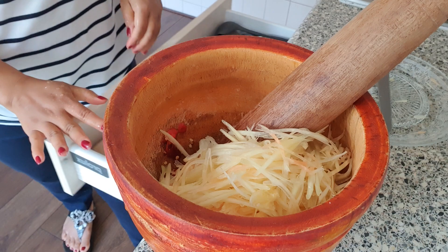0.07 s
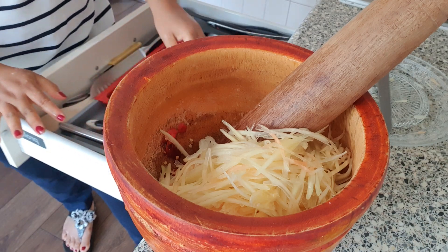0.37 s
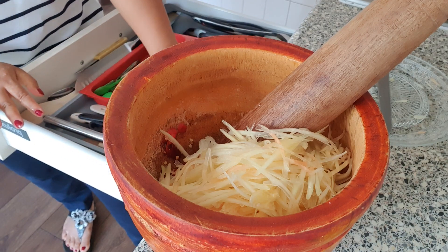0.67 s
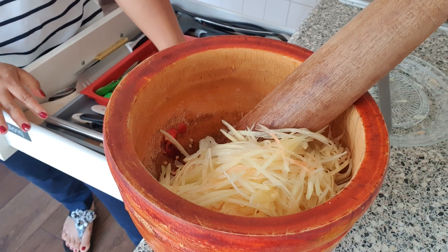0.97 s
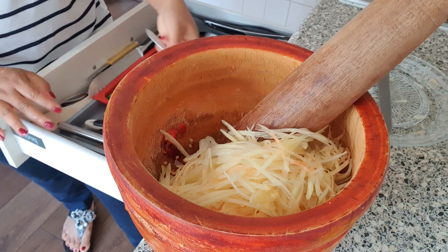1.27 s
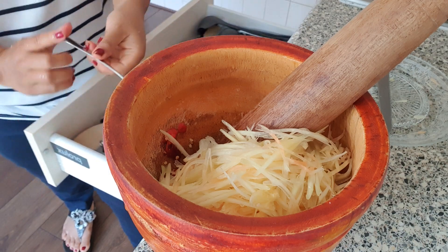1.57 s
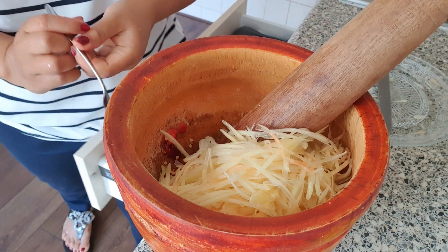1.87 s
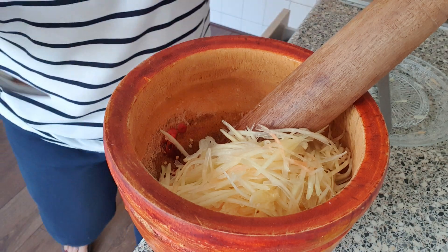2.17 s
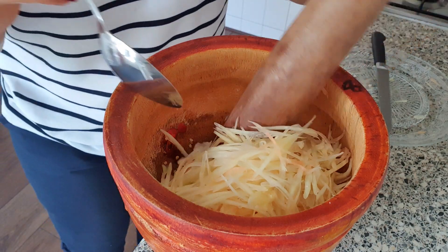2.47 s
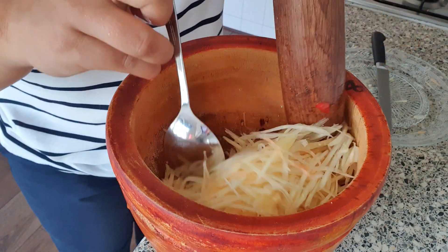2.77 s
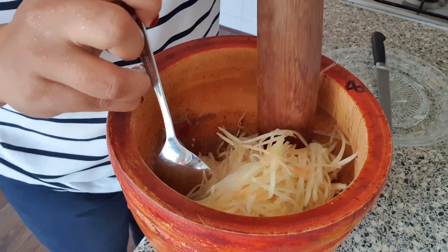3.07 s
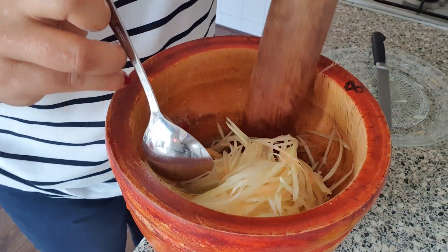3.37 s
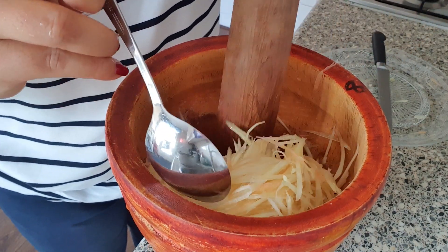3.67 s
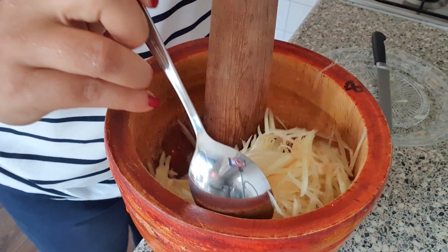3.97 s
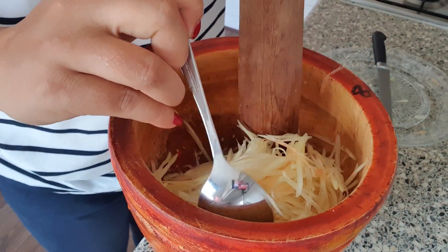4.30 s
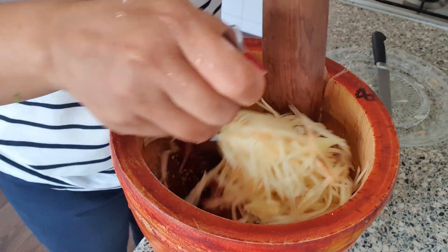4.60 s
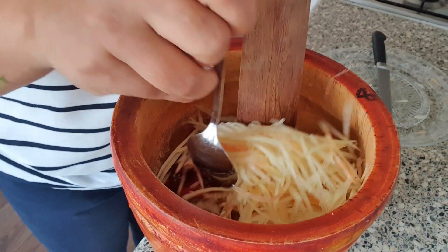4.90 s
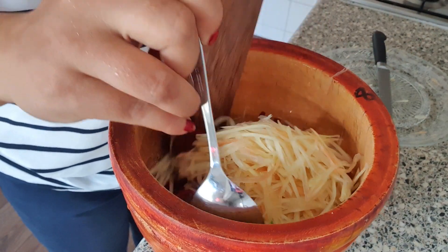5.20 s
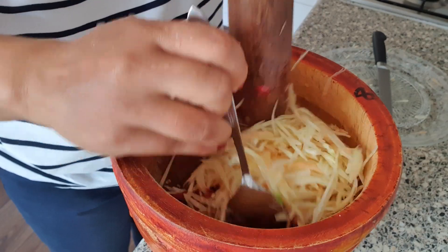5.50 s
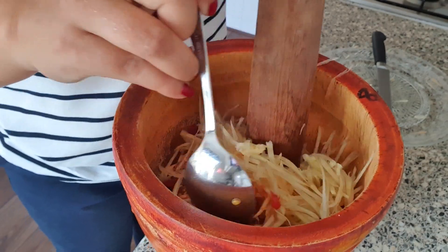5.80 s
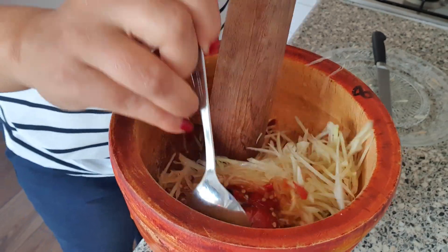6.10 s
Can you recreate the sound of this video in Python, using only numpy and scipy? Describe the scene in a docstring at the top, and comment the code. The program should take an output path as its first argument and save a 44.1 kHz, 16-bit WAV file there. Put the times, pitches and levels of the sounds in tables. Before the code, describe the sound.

Cutlery clatters in a drawer that rolls shut, followed by hollow wooden knocks, dull thuds and squelches from a pestle and mortar.

```python
"""A small, hard kitchen. A drawer rumbles open on its bearings, a spoon is dragged from the cutlery tray,
steel scraping on steel, and the drawer is pushed shut. Then a wooden pestle works shredded vegetables
in a wooden mortar on a stone counter: sharp knocks where wood meets wood, dull thuds through the food,
wet squelches and low groans under each press, and small ticks and scrapes of the spoon."""
import sys
import numpy as np
from scipy import signal
from scipy.fft import rfft, irfft, next_fast_len
from scipy.io import wavfile
from scipy.ndimage import uniform_filter1d

SR = 44100
rng = np.random.default_rng(int(sys.argv[2]) if len(sys.argv) > 2 else 0)


def output_pcm(signal):
    """Save a mono or channel-first signal as 16-bit PCM at the path in sys.argv[1].

    Samples are clipped to [-1, 1] before scaling.
    """
    pcm = np.clip(np.atleast_2d(signal).T, -1, 1) * 32767
    wavfile.write(sys.argv[1], SR, np.round(pcm).astype(np.int16))


N = 275625
TIME = np.arange(N) / SR
RING_S = np.arange(SR * 3 // 5) / SR   # time axis of a one-shot


def from_db(db):
    """Decibels to gain."""
    return 10 ** (np.asarray(db) / 20)


def rms_one(x):
    """Scale to unit power."""
    return x / np.sqrt(np.mean(x ** 2) + 1e-20)


def at_hz(points, hz):
    """Read a curve along log frequency."""
    known_hz, values = np.transpose(points)
    return np.interp(np.log(np.maximum(hz, 1)), np.log(known_hz), values)


def add(out, s, sound):
    """Drop a one-shot into the track at s seconds."""
    start = max(round(s * SR), 0)
    out[:, start:start + sound.shape[-1]] += sound[..., :N - start]


def decay(t60):
    """Envelope that falls 60 dB in t60 seconds."""
    return np.exp(-np.log(1000) * RING_S / t60)


def gesture(s, hold_s, attack_s, release_s):
    """Envelope of an effort: swells to its peak at s seconds, holds, releases."""
    return np.exp(-np.clip(np.maximum((s - TIME) / attack_s, (TIME - s - hold_s) / release_s), 0, 20))


def filtered(x, kind, hz, order=2):
    """Butterworth low-, high- or band-pass."""
    return signal.sosfilt(signal.butter(order, np.minimum(hz, SR / 2 - 1), kind, fs=SR, output="sos"), x)


def cushioned(x, hardness_hz, octaves):
    """A cushioned contact drives only a band of the low modes; the softer, the deeper."""
    return filtered(x, "band", [hardness_hz / 2 ** octaves, hardness_hz])


def grains(per_s, spread_db, grain_s):
    """Granular noise: tiny contacts of uneven size."""
    sizes = from_db(spread_db * np.minimum(rng.exponential(1, N), 4))
    contacts = sizes * (rng.random(N) < per_s / SR)
    power = signal.lfilter([1], [1, -np.exp(-1 / (grain_s * SR))], contacts ** 2 + 1e-12)
    return rms_one(np.sqrt(power) * rng.standard_normal((2, N)))


# Stereo image, centred lows and wide highs: (frequency [Hz], left-right correlation [0-1])
STEREO_LIKENESS = [(100, 1), (300, 0.88), (640, 0.66), (1400, 0.26), (3000, 0.011), (16000, 0.14)]
def coloured(white, colour):
    """EQ two unrelated noises and mix them as mid and side into a stereo pair; rms 1."""
    size = next_fast_len(white.shape[1], real=True)
    hz = np.arange(size // 2 + 1) * SR / size
    alike = at_hz(STEREO_LIKENESS, hz)
    mid, side = rfft(white, size) * from_db(at_hz(colour, hz))
    pair = np.sqrt(1 + alike) * mid + np.sqrt(1 - alike) * side * [[1], [-1]]
    return rms_one(irfft(pair, size)[:, :white.shape[1]])


def burst(colour=((1, 0),)):
    """Stereo noise for a one-shot, white unless given a colour."""
    return coloured(rng.standard_normal((2, len(RING_S))), colour)


def struck(modes, vary_db=1.0):
    """One hit: each mode varies in strength, and high modes reach the two sides out of step."""
    out = np.zeros((2, len(RING_S)))
    for hz, db, t60 in modes:
        lag = np.arccos(at_hz(STEREO_LIKENESS, hz)) * rng.permutation([0, 1])[:, None]
        phase = np.maximum(2 * np.pi * hz * RING_S - lag, 0)
        out += from_db(db + vary_db * rng.standard_normal()) * decay(t60) * np.sin(phase)
        out = -out   # neighbouring modes swing in opposite directions
    return out


def tick(hz, octaves, t60_at_1khz=0.065, damping=0.29):
    """One light touch in its own band, tighter the higher it is; peak 1."""
    touch = burst() * decay(t60_at_1khz / (hz / 1000) ** damping)
    band = filtered(touch + 1e-18, "band", hz * 2 ** (np.array([-.5, .5]) * octaves))
    return band / np.abs(band).max()


# EQ of the room tone: (frequency [Hz], level [dB])
ROOM_TONE_EQ = [(25, 12.5), (70, -0.5), (130, -15.5), (300, -2), (700, -33), (2000, -12), (5000, -14),
                (10000, -22), (16000, -48)]
def room_tone(level_db=-61):
    """A steady bed of low rumble and faint air."""
    return from_db(level_db) * coloured(rng.standard_normal((2, N)), ROOM_TONE_EQ)


# Length of the room's tail: (frequency [Hz], T60 [s])
REVERB_T60 = [(100, 0.46), (500, 0.45), (2000, 0.39), (5000, 0.43), (10000, 0.22), (16000, 0.19)]
# Reverb send: (frequency [Hz], level [dB])
REVERB_SEND = [(80, 1.5), (250, -14.5), (550, -6), (1200, -5), (3000, -8.5), (8000, -9), (16000, -12)]
def kitchen_reverb(dry, predelay_s=0.0073, build_s=0.00087):
    """Diffuse echoes build up after the first wall and die band by band."""
    white = burst()
    edges = np.geomspace(60, 17000, 15)
    onset = 1 - np.exp(-np.maximum(RING_S - predelay_s, 0) / build_s)
    response = 0
    for low, high in zip(edges, edges[1:]):
        hz = np.sqrt(low * high)
        band = np.roll(filtered(white, "band", [low, high]), rng.integers(len(RING_S)), axis=1)
        tail = rms_one(band * onset * decay(at_hz(REVERB_T60, hz)))
        unity_gain = np.sqrt(2 * (high - low) / SR / len(RING_S))
        response = response + from_db(at_hz(REVERB_SEND, hz)) * tail * unity_gain
    return signal.fftconvolve(dry, response, axes=1)[:, :N]


# Drawer cues (pull, recoil, nudge, push shut): (peak time [s], hold [s], level [dB], attack [s])
DRAWER_ROLLS = [(0.0, 0.031, -42.5, .02), (0.324, 0.012, -50, 0.0063), (0.581, 0.0045, -51.5, 0.02),
                (1.9, .48, -48.5, 0.32)]
# Swishes of the runners: (peak time [s], level [dB], attack [s], release [s])
RUNNER_SLIDES = [(.035, -50, 0.024, 0.063), (.6, -55.5, 0.014, 0.048), (1.95, -52.5, 0.073, .14),
                 (2.34, -53.5, 0.01, 0.14)]
# Low body of the panels: (frequency [Hz], level [dB])
RUMBLE_EQ = [(29, -26.5), (50, 2), (86, -0.5), (142, -5.5), (216, -6), (342, -10), (410, -4.5), (532, -5),
             (877, -11.5), (1210, -14), (1360, -15.5), (2980, -22), (6000, -38), (7800, -56.5),
             (13200, -120)]
# Bright top of runners and clinks: (frequency [Hz], level [dB])
HISS_EQ = [(2000, -6.5), (4000, -8), (7500, -13), (10000, -10), (12000, -21.5), (16000, -25)]
# Midrange chatter of loose cutlery: (frequency [Hz], level [dB])
JIGGLE_EQ = [(300, -14), (600, 8), (950, -9.5), (1240, 4.5), (1700, -23), (3050, 0), (3600, -10.5),
             (4300, -15.5), (7000, -34), (16000, -26)]
def drawer(rumble_db=7, hiss_db=5, jiggle_db=-5, clink_db=-15, coast_s=.1):
    """Bearings rumble through the drawer's panels; runners hiss, cutlery jiggles and clinks."""
    roll = sum(from_db(db) * gesture(s, hold, attack, coast_s) for s, hold, db, attack in DRAWER_ROLLS)
    slide = sum(from_db(db) * gesture(s, 0, attack, release) for s, db, attack, release in RUNNER_SLIDES)
    rumble = from_db(rumble_db) * coloured(grains(per_s=900, spread_db=2.2, grain_s=.003), RUMBLE_EQ)
    hiss = from_db(hiss_db) * coloured(grains(per_s=7100, spread_db=3, grain_s=.0023), HISS_EQ)
    jiggle = from_db(jiggle_db) * coloured(grains(per_s=45, spread_db=2.5, grain_s=.005), JIGGLE_EQ)
    clinks = from_db(clink_db) * coloured(grains(per_s=14, spread_db=2, grain_s=.002), HISS_EQ)
    return roll * (rumble + jiggle + clinks) + slide * hiss


# Drags through the tray: (peak time [s], hold [s], level [dB], attack [s])
CUTLERY_DRAGS = [(.73, 0.055, -32.5, 0.013), (0.983, 0.054, -21.5, 0.04)]
# Accents where pieces clash: (time [s], level [dB])
CUTLERY_CLASHES = [(0.982, -19), (1.094, -14.5)]
# Bright rasp of steel on steel: (frequency [Hz], level [dB])
STEEL_EQ = [(880, -2.5), (1500, -2), (1870, 0), (2040, -5), (2690, -0.5), (3960, 2), (5070, -1.5),
            (6430, -1), (7460, -4), (9850, -1), (11000, -8), (12600, -4), (16000, -9.5)]
# Shimmer of the cutlery: (frequency [Hz], level [dB], T60 [s])
STEEL_MODES = [(1921, -2, .08), (4040, -3, .12), (4659, 0, .25), (5329, -2, .22), (8324, -2, .22),
               (8779, -2, .22), (9205, -4, .22), (9842, -4, .22), (11617, -2, .25)]
# Boxy body of the tray: (frequency [Hz], level [dB])
TRAY_EQ = [(40, -10), (85, -6.5), (150, -6), (280, -17.5), (400, -1.5), (600, 3.5), (750, -2), (1020, 0),
           (1400, -10), (2500, -41)]
def cutlery(steel_db=-2.5, ring_db=-13, tray_db=-20, clash_db=-12, clash_t60=0.17, release_s=0.051):
    """Steel scrapes and clashes on steel, setting its modes ringing and the tray rattling."""
    drag = sum(from_db(db) * gesture(s, hold, attack, release_s) for s, hold, db, attack in CUTLERY_DRAGS)
    force = np.tile(from_db(steel_db) * drag, (2, 1))
    for s, db in CUTLERY_CLASHES:
        add(force, s, from_db(db + clash_db) * decay(clash_t60))
    scrape = force * coloured(grains(per_s=1900, spread_db=2.7, grain_s=.0009), STEEL_EQ)
    ring = scrape.std() * rms_one(signal.fftconvolve(scrape, struck(STEEL_MODES), axes=1)[:, :N])
    tray_drive = drag ** 0.63   # the tray follows the drag with compressed dynamics
    rattle = tray_drive * coloured(grains(per_s=310, spread_db=2.5, grain_s=.0035), TRAY_EQ)
    return scrape + from_db(ring_db) * ring + from_db(tray_db) * rattle


# Bumps on the spoon: (time [s], level [dB])
SPOON_TINGS = [(0.705, -34), (1.199, -31), (1.286, -40.5), (1.643, -23.5), (1.764, -34.5), (1.779, -28.5),
               (2.203, -30), (4.107, -40.5)]
# Choked ring of the spoon: (frequency [Hz], level [dB], T60 [s])
SPOON_MODES = [(1235, 0, .1), (1275, -4, .035), (2724, -27, .08), (3100, -22, .06), (4237, -32, .12)]
def spoon_tings():
    """The bumped spoon rings briefly, damped by the fingers."""
    out = np.zeros((2, N))
    for s, db in SPOON_TINGS:
        add(out, s, from_db(db) * struck(SPOON_MODES))
    return out


# Handling detail: (time [s], level [dB], centre [Hz], width [octaves])
HANDLING_TICKS = [(0.323, -29.5, 2820, 2.5), (0.358, -27, 2400, 1.17), (0.449, -43, 8050, 0.71),
                  (0.552, -33.5, 680, 2.7), (0.58, -29.5, 534, 0.36), (.659, -41, 7950, 0.74),
                  (.69, -33.5, 520, 1.3), (1.261, -32.5, 2240, 1), (1.488, -47.5, 4000, 2.6),
                  (1.519, -44, 8600, 0.32), (1.579, -43, 5470, 1.05), (2.203, -36, 1500, 0.81),
                  (2.417, -32.5, 2164, 0.54), (2.543, -28.5, 2400, 0.82), (2.726, -41, 2900, .25),
                  (3.423, -30.5, 990, 2.24), (3.54, -26.5, 5830, 1.16), (3.721, -23, 840, 0.89),
                  (3.72, -33, 3430, 2.3), (3.871, -27.5, 1640, 2.9), (5.04, -29, 2170, 0.9),
                  (6.231, -34, 2980, 2.4)]
def handling_ticks():
    """Spoon, tray and fingers touch lightly."""
    out = np.zeros((2, N))
    for s, db, hz, octaves in HANDLING_TICKS:
        add(out, s, from_db(db) * tick(hz, octaves))
    return out


# Strokes of the spoon on wood: (peak time [s], hold [s], level [dB])
SPOON_SCRAPES = [(4.22, 0.018, -54), (4.44, 0.21, -58), (4.839, .04, -60.5), (5.439, 0.01, -37)]
# Nasal peak of the scrape: (frequency [Hz], level [dB])
SCRAPE_EQ = [(900, -13), (1800, -10), (2250, 0), (2800, -7.5), (5000, -19), (12000, -34.5)]
def spoon_scrapes(attack_s=0.022, release_s=0.021):
    """The spoon's edge catches on the grain of the wood and sings in one resonance."""
    force = sum(from_db(db) * gesture(s, hold, attack_s, release_s) for s, hold, db in SPOON_SCRAPES)
    return force * coloured(grains(per_s=800, spread_db=4.5, grain_s=.0027), SCRAPE_EQ)


PRESS_HOLD_S, PRESS_RELEASE_S = 0.0082, 0.019
# Spoon and pestle press the shreds along the wall:
# (peak time [s], wet level [dB], groan level [dB], groan hardness [Hz], attack [s])
FOOD_PRESSES = [(3.207, -41, -40, 297, 0.074), (3.534, -47, -37.5, 250, .055), (3.581, -41, -41, 860, 0.02),
                (3.922, -40, -22, 252, 0.011), (3.979, -40, -22, 467, 0.029),
                (4.097, -49.5, -48, 403, 0.021), (4.283, -38.5, -60, 407, 0.009),
                (4.513, -42, -37, 690, 0.032), (4.642, -61, -39, 446, .04), (4.857, -58, -32.5, 506, 0.015),
                (4.905, -33.5, -36.5, 795, 0.012), (5.072, -52.5, -64, 397, 0.0067),
                (5.301, -34, -38, 295, 0.043), (5.745, -37, -41, 402, 0.071),
                (6.073, -37, -30.5, 300, 0.046)]
# Wet texture of the shreds: (frequency [Hz], level [dB])
SQUELCH_EQ = [(300, 0.5), (600, -7), (1200, -8), (2300, -4.5), (4200, -6.5), (7000, -15.5), (10000, -18),
              (16000, -35)]
def squelches(crackle_db=2, snap_db=7, snap_attack_s=0.014):
    """Wet fibres smear and crackle under each press; the quicker it is, the louder they snap."""
    pressure = sum(from_db(db) * gesture(s, PRESS_HOLD_S, attack_s, PRESS_RELEASE_S)
                   for s, db, _, _, attack_s in FOOD_PRESSES)
    mush = coloured(grains(per_s=1400, spread_db=1.5, grain_s=.003), SQUELCH_EQ)
    crackle = coloured(grains(per_s=420, spread_db=3.5, grain_s=.0006), SQUELCH_EQ)
    out = pressure * rms_one(mush + from_db(crackle_db) * crackle)
    for s, db, _, _, attack_s in FOOD_PRESSES:
        quickness = snap_attack_s / attack_s
        add(out, s, from_db(db + snap_db) * quickness * tick(hz=3740, octaves=1.56))
    return out


# Low end of the mortar rocking on counter and cabinet: (frequency [Hz], level [dB], T60 [s])
COUNTER_MODES = [(76.4, -8.5, 0.16), (97.6, -7, 0.25), (125.6, -3.5, 0.22), (153.4, -9.5, 0.12),
                 (184.4, -8, 0.11), (203.5, -9, 0.071), (223.6, -1.5, 0.11), (259.4, -1, 0.076),
                 (295.4, 0.5, 0.12), (321.3, -12, 0.16), (367, -12.5, 0.078), (471, -14.5, 0.1),
                 (550, -11, 0.11), (637, -2, .06), (810, -15.5, .06), (1106, -14.5, 0.11)]
def groans(slips_per_s=600):
    """Uneven slips keep the counter's low modes groaning for as long as a press lasts."""
    slips = rng.choice([-1, 1], N) * (rng.random(N) < slips_per_s / SR)
    groan = signal.fftconvolve(slips[None], struck(COUNTER_MODES), axes=1)[:, :N]
    out = 0
    for s, _, db, hardness_hz, attack_s in FOOD_PRESSES:
        rub = cushioned(groan, hardness_hz, octaves=1.5)
        running_rms = np.sqrt(uniform_filter1d(np.mean(rub ** 2, axis=0), size=1300) + 1e-12)
        even_rub = rub / running_rms   # the hand presses evenly
        out = out + from_db(db) * gesture(s, PRESS_HOLD_S, attack_s, PRESS_RELEASE_S) * even_rub
    return out


# Soft hits, drawer on its stops and pestle in the food: (time [s], level [dB], hardness [Hz])
SOFT_HITS = [(0.327, -29, 138), (.425, -37, 123), (2.337, -25, 187), (2.91, -25.5, 209), (3.166, -24, 199),
             (3.36, -29, 334), (3.43, -17, 290), (3.579, -30.5, 160.5), (3.979, -11.5, 454),
             (4.287, -27.5, 123.4), (4.899, -21.5, 222), (5.078, -31, 125), (5.312, -15.5, 145.7)]
def thuds(attack_s=.0008, lead_cycles=2.312, bounce_s=.036, bounce_db=-9.5, bounce_hardness=0.861):
    """Soft hits and the pestle's landing after each knock rock the counter, then bounce once."""
    out = np.zeros((2, N))
    landing_hz, hz_per_db = 372, 5   # a lighter landing is also duller
    landings = [(s + lag_s, db, max(landing_hz + hz_per_db * db, 100))
                for s, _, _, _, lag_s, db in PESTLE_KNOCKS]
    hits = landings + SOFT_HITS
    bounces = [(s + bounce_s, db + bounce_db, hz * bounce_hardness) for s, db, hz in hits]
    for s, db, hardness_hz in hits + bounces:
        body = struck(COUNTER_MODES) * (1 - np.exp(-RING_S / attack_s))
        thud = cushioned(body, hardness_hz, octaves=1.99)
        start_s = s - lead_cycles / hardness_hz   # each hit starts a few cycles before its listed time and peaks near it
        add(out, start_s, from_db(db) * thud / np.abs(thud).max())
    return out


# The pestle strikes the mortar's wall, then its weight lands:
# (time [s], level [dB], hardness [Hz], bowl ring [dB], landing lag [s], landing level [dB])
PESTLE_KNOCKS = [(2.787, 1, 3850, 4, 0.0055, -13), (3.843, -28, 1960, 1, 0.039, -10.5),
                 (4.582, -25, 1590, -4, .004, -22), (5.168, -24.5, 1880, 2.5, 0.0032, -44.5),
                 (5.203, 2.5, 2140, -1.5, .015, -4), (5.478, -2, 2270, -11, 0.0046, -9),
                 (5.629, 1, 2270, 0, 0.0151, -5.5), (5.666, -12, 2460, 4.5, 0.01037, -12),
                 (5.928, -5.5, 2450, -3, .016, -10.5), (6.019, -4.5, 2160, -1, 0.0029, -12.5)]
# Ring of mortar and pestle: (frequency [Hz], level [dB], T60 [s])
WOOD_MODES = [(205, -21, .2), (285, -20, .2), (455, -31, .1), (522, -19, .12), (556, -14, .14),
              (594, -19, .12), (615, -20, .12), (760, -29, .08), (835, -30, .12), (1077, -21, .14),
              (1330, -22, .04), (1755, -24, .06), (2030, -13, .04), (2083, -14, .07), (2520, -14, .025),
              (2990, -16, .03), (3600, -15, .02)]
# Hollow body of the clack: (frequency [Hz], level [dB])
CLACK_EQ = [(200, -2.5), (550, 17.5), (900, 4), (1500, 3), (2200, 4), (4000, 9.5), (7000, 9),
            (16000, -21.5)]
# Bright edge of a hard hit: (frequency [Hz], level [dB])
CRACK_EQ = [(2000, 10.5), (6000, 2), (9000, -1), (12000, -7.5), (16000, -17.5)]
def pestle_knocks(clack_db=-5, clack_t60=.035, hollow_db=-25, hollow_t60=0.32,
                  crack_db=-29, crack_t60=0.3, contact_s=0.00013):
    """Wood on wood: a short clack lingers in the bowl's hollow, the modes ring, hard hits also crack."""
    out = np.zeros((2, N))
    hardest_hz = max(hz for _, _, hz, *_ in PESTLE_KNOCKS)
    onset = 1 - np.exp(-RING_S / contact_s)
    for s, db, hardness_hz, ring_db, _, _ in PESTLE_KNOCKS:
        bite = (hardness_hz / hardest_hz) ** 2
        hollow = from_db(hollow_db + ring_db) * decay(hollow_t60)
        clack = from_db(clack_db) * burst(CLACK_EQ) * (decay(clack_t60) + hollow)
        crack = from_db(crack_db) * bite * burst(CRACK_EQ) * decay(crack_t60 * bite)
        ring = from_db(ring_db) * struck(WOOD_MODES)
        body = filtered(clack + ring, "low", hardness_hz, order=4)   # a softer contact loses its top
        add(out, s, from_db(db) * (body + crack) * onset)
    return out


def scene():
    """The mix: all the action at the counter, its reverb and the room tone."""
    dry = drawer() + cutlery() + spoon_tings() + handling_ticks()
    dry = dry + pestle_knocks() + thuds() + squelches() + groans() + spoon_scrapes()
    return dry + kitchen_reverb(dry) + room_tone()


# Tonal lean of the microphone pair: (frequency [Hz], left minus right [dB])
MIC_BALANCE = [(100, -2.5), (250, -3), (600, 2), (1300, 1.5), (2400, 0), (4500, 2.5), (8000, -2.5),
               (16000, -7.5)]
def record(dry, low_cut_hz=58, ceiling=.95, high_cut_hz=15950):
    """Two microphones of unequal colour, then a low cut, a soft clip and a steep high cut."""
    size = next_fast_len(N + SR // 2, real=True)
    lean_db = at_hz(MIC_BALANCE, np.arange(size // 2 + 1) * SR / size)
    mic_gains = from_db(lean_db * np.array([[.5], [-.5]]))
    heard = irfft(rfft(dry, size) * mic_gains, size)[:, :N]
    heard = filtered(heard, "high", low_cut_hz, order=3)
    rounded = heard / (1 + (heard / ceiling) ** 4) ** .25
    high_cut = signal.ellip(10, .1, 80, high_cut_hz, fs=SR, output="sos")
    return signal.sosfilt(high_cut, rounded)


dry = scene()
out = record(dry)
output_pcm(out)
```